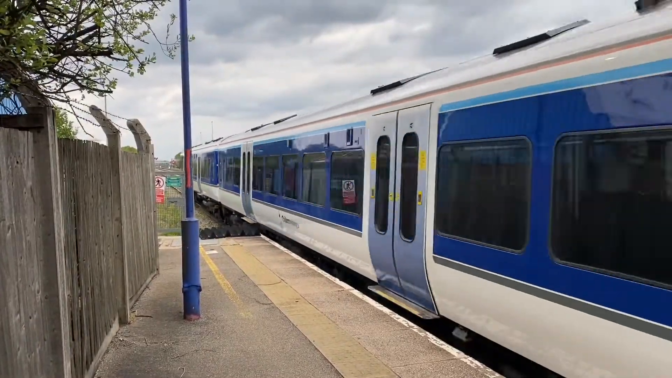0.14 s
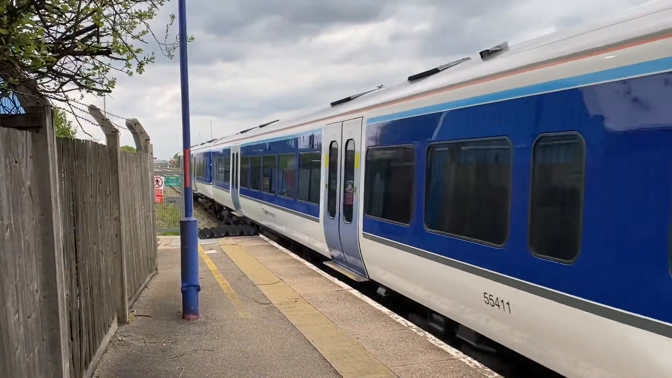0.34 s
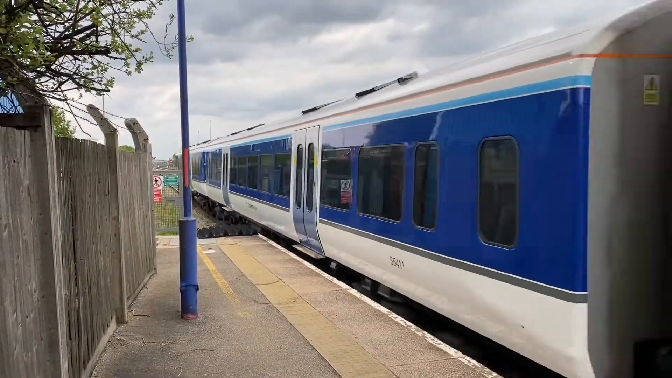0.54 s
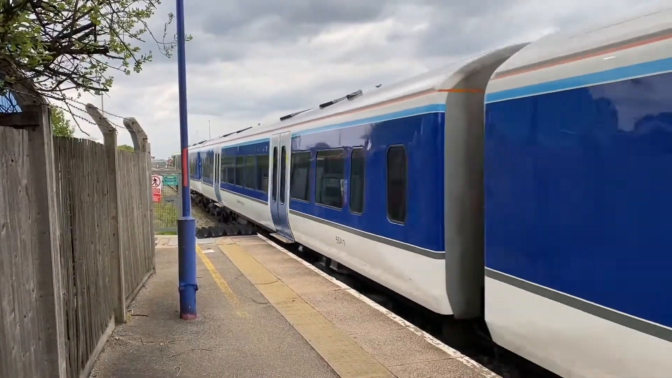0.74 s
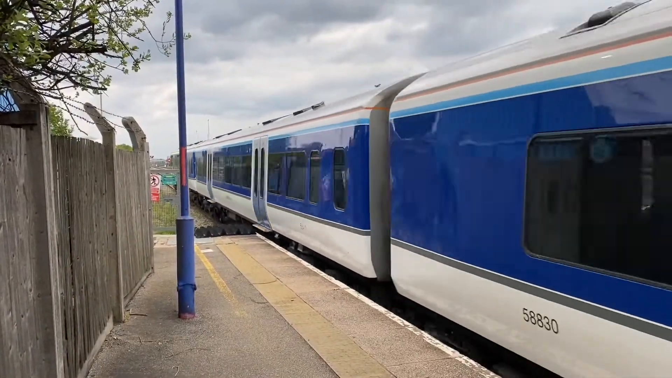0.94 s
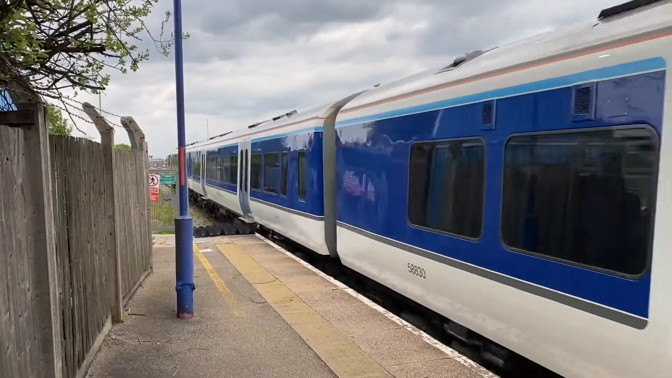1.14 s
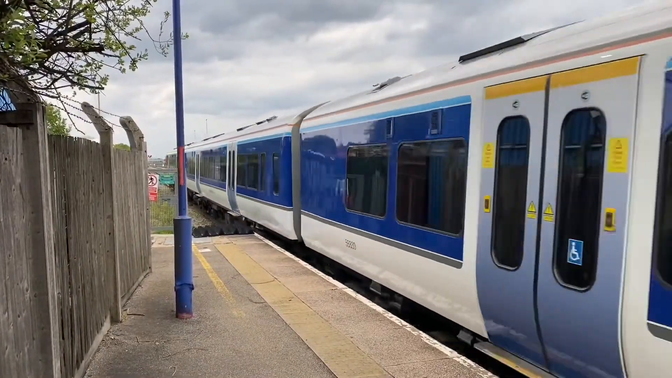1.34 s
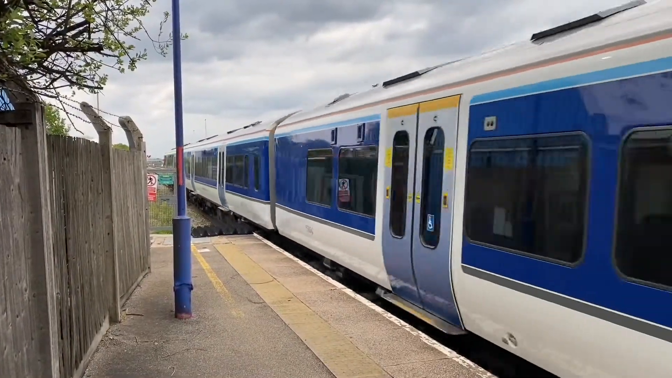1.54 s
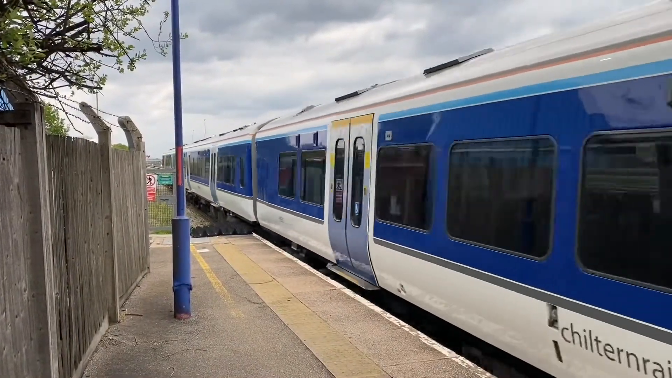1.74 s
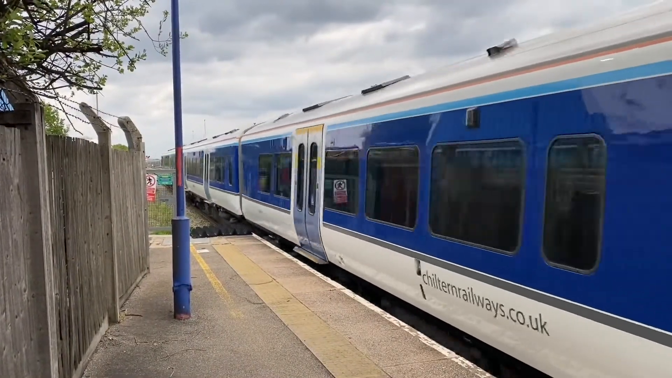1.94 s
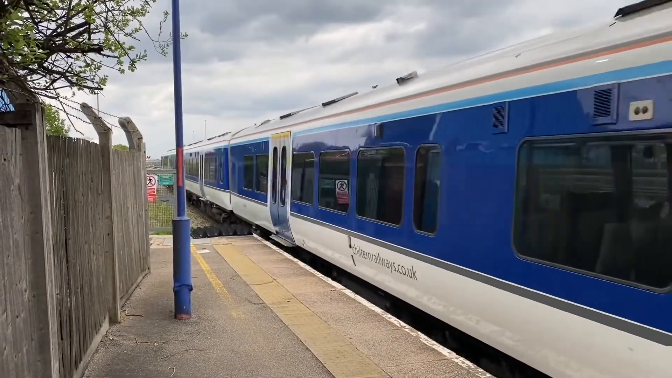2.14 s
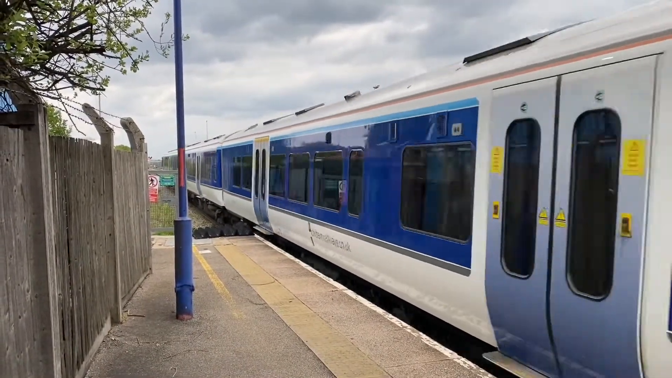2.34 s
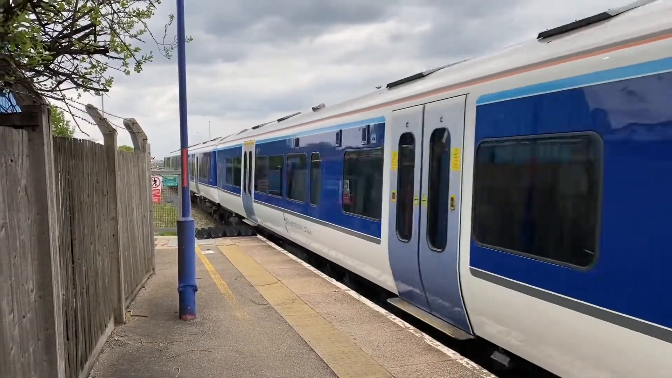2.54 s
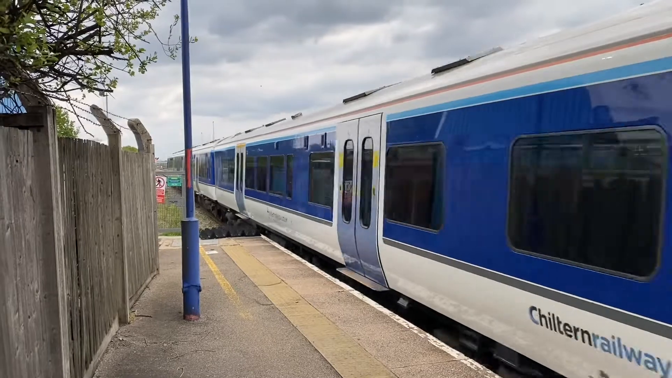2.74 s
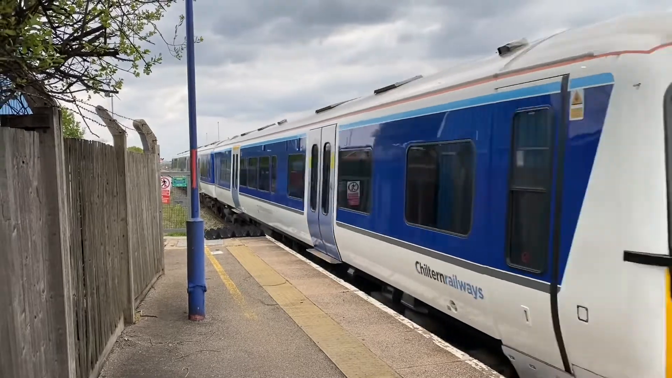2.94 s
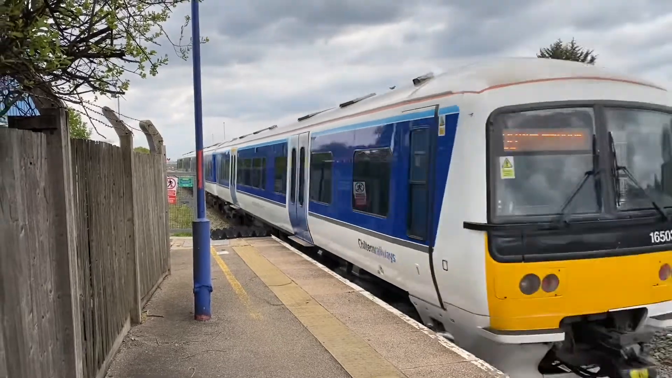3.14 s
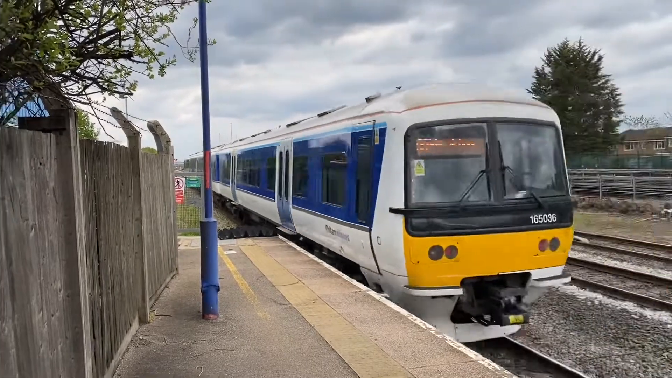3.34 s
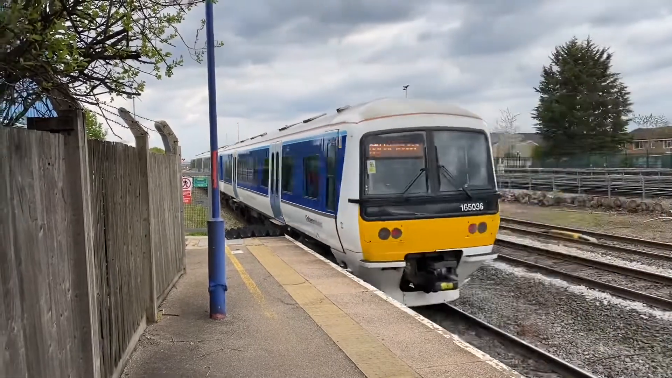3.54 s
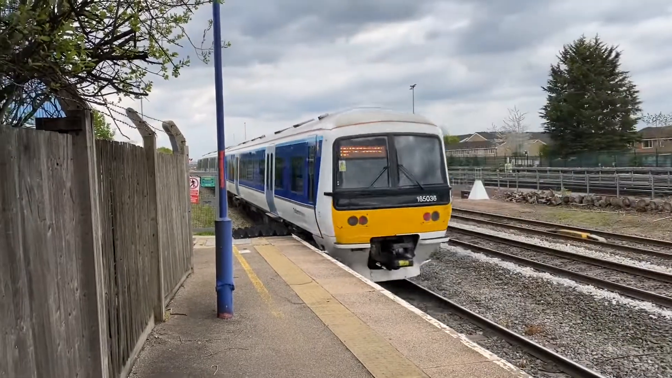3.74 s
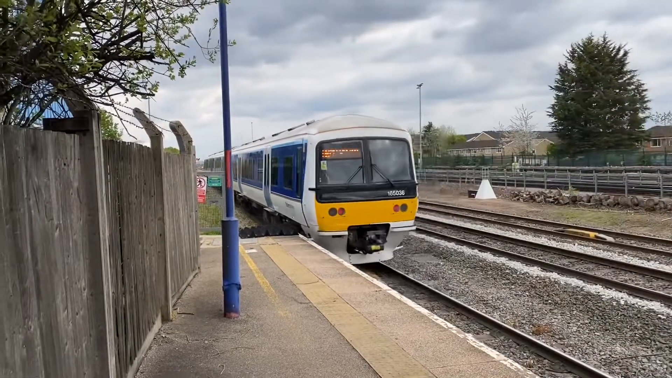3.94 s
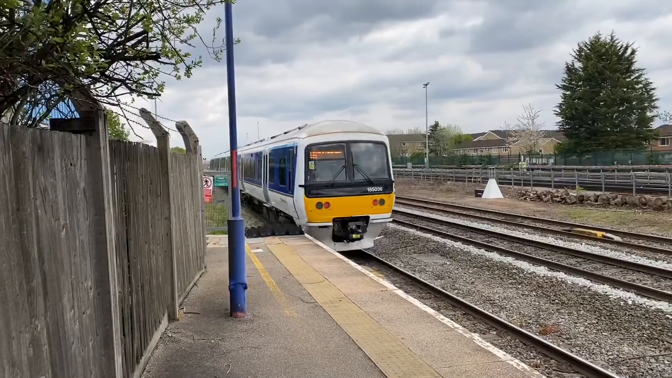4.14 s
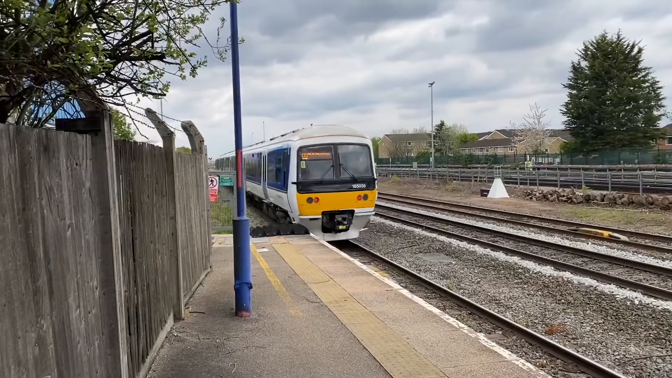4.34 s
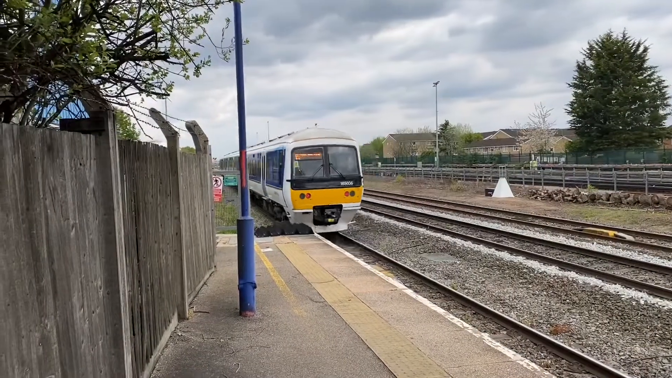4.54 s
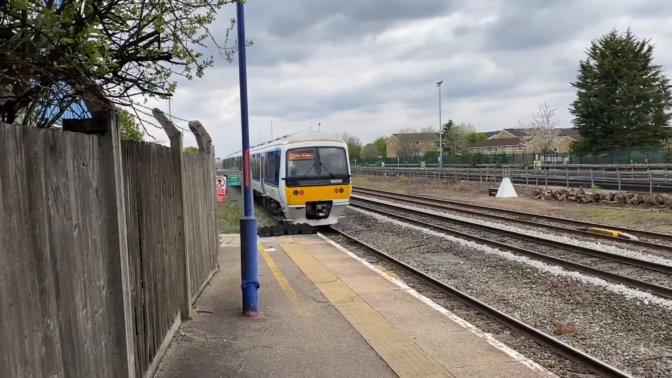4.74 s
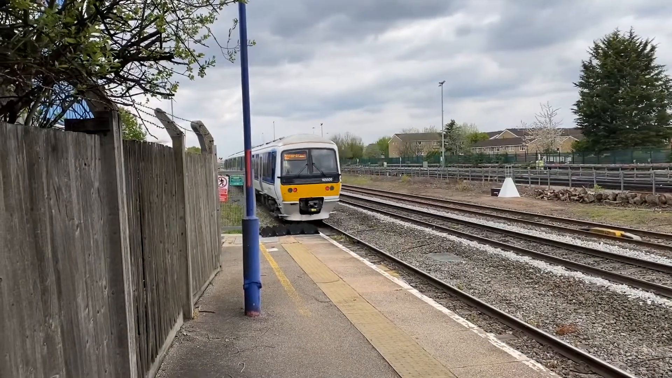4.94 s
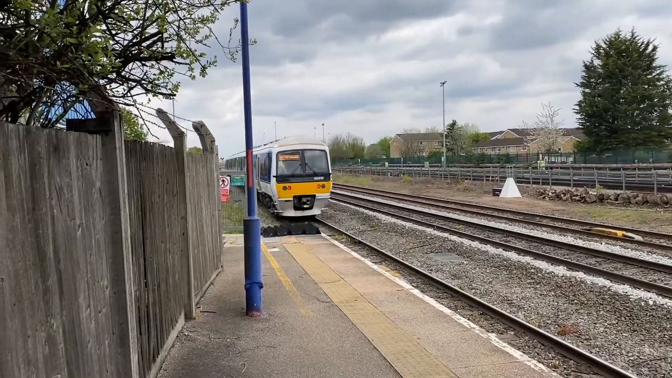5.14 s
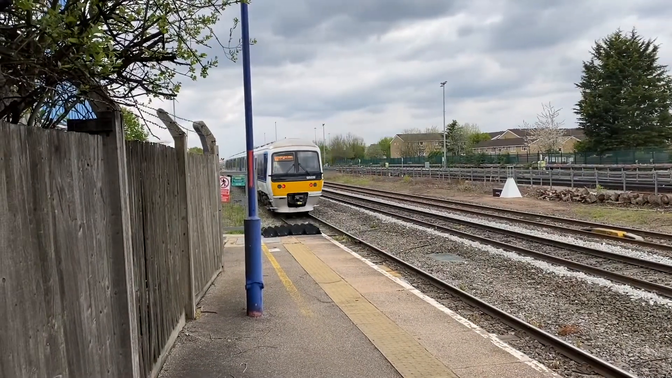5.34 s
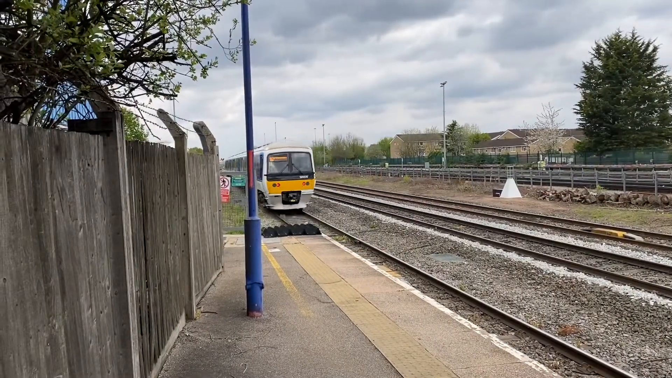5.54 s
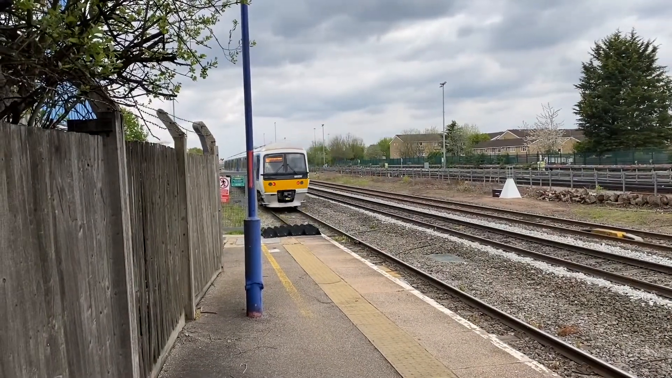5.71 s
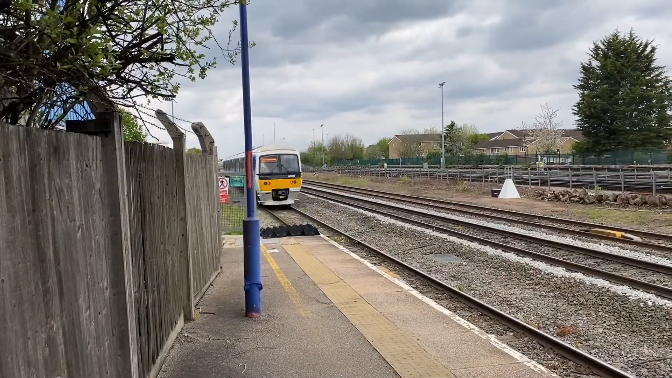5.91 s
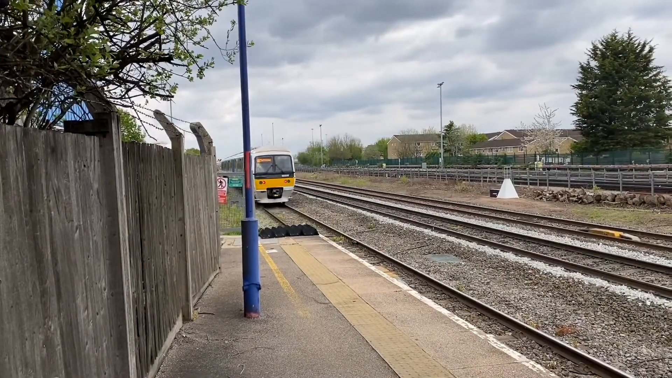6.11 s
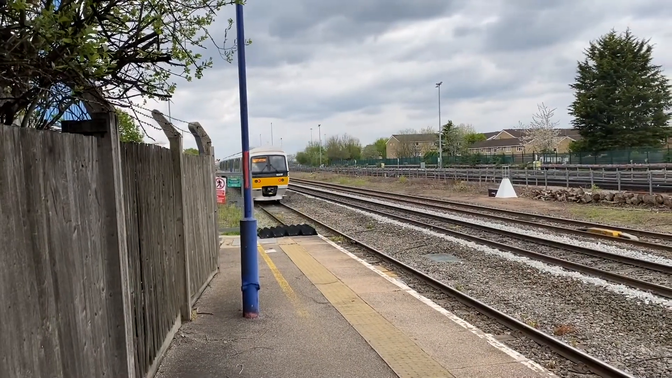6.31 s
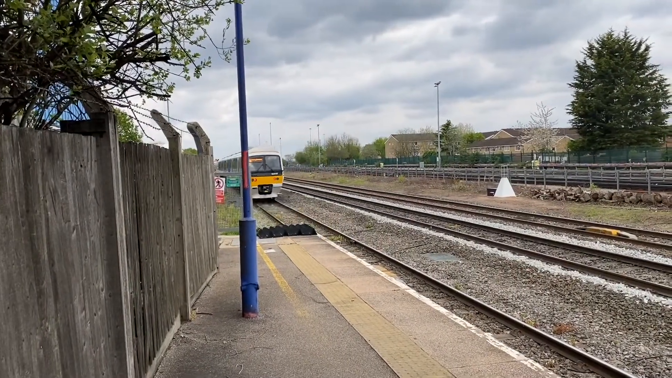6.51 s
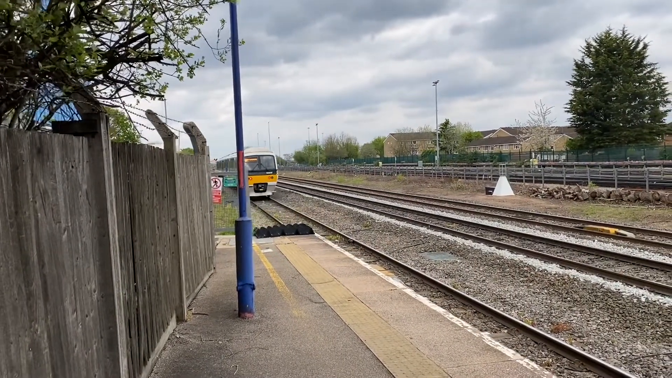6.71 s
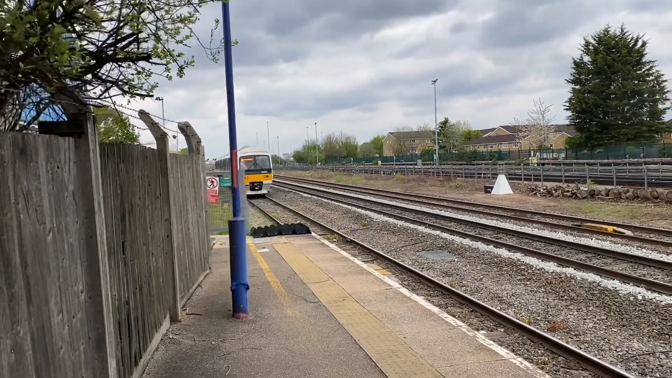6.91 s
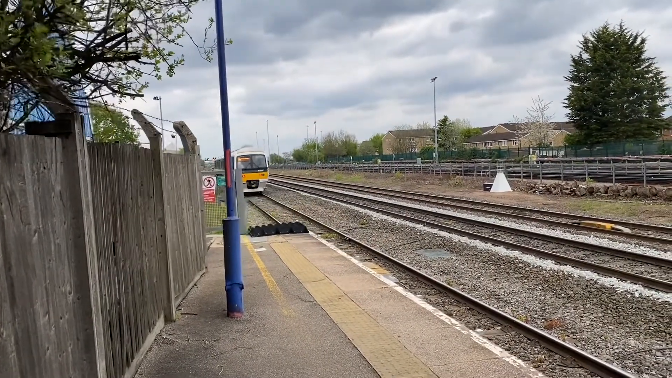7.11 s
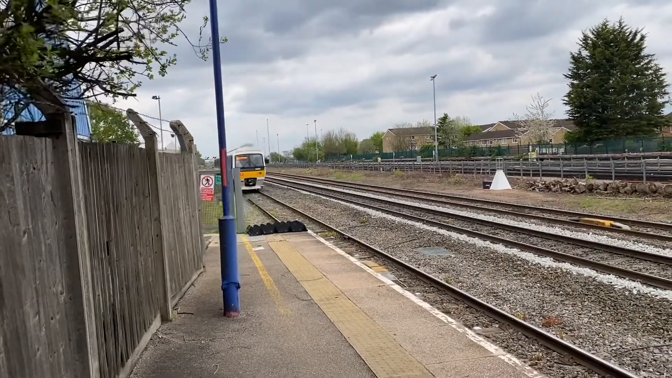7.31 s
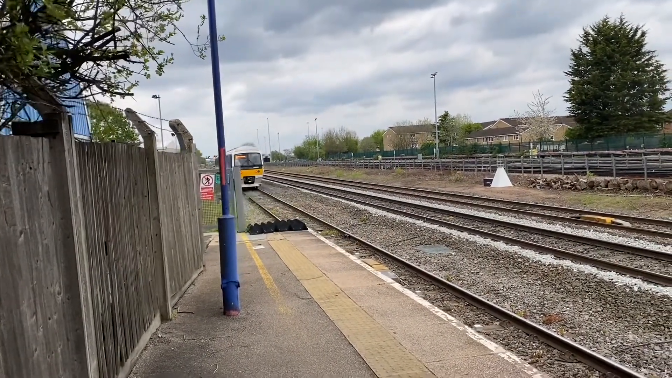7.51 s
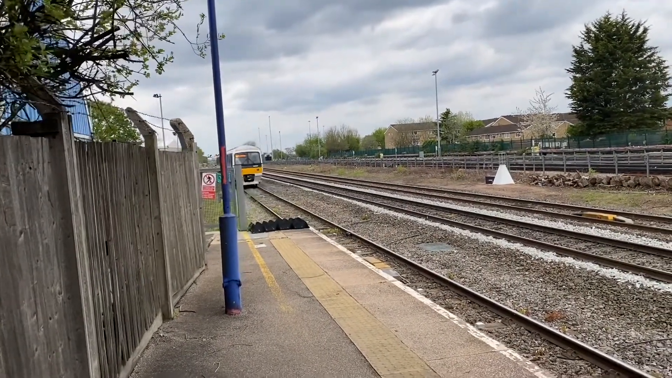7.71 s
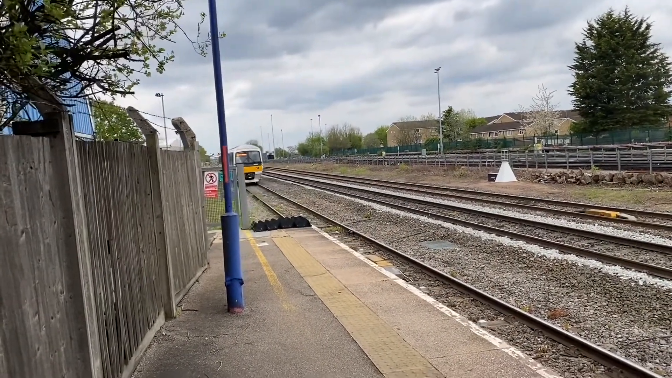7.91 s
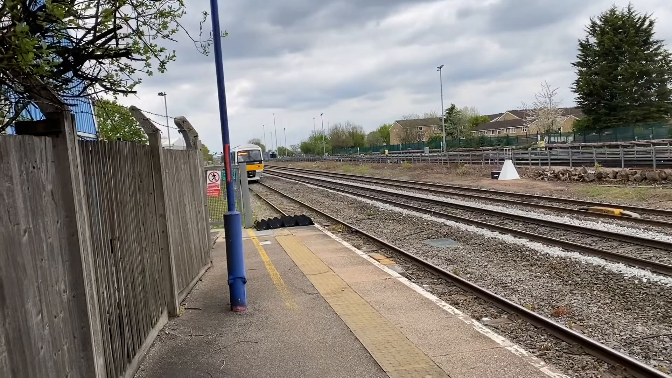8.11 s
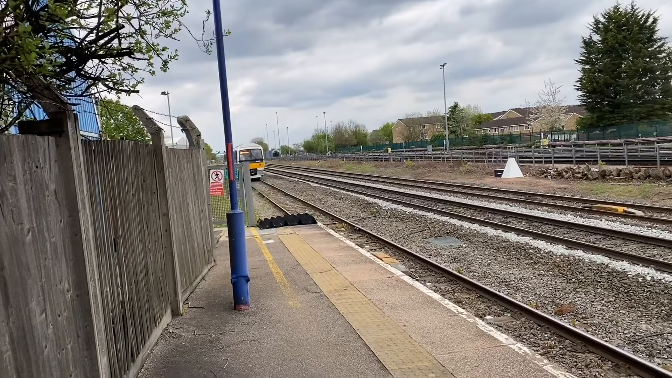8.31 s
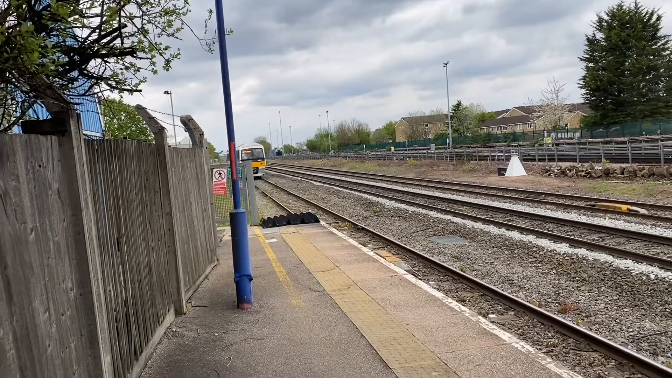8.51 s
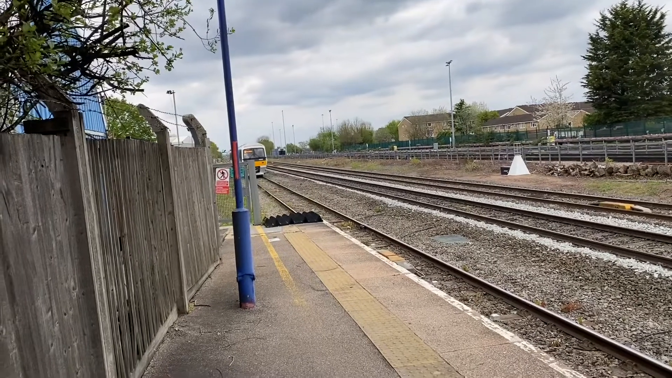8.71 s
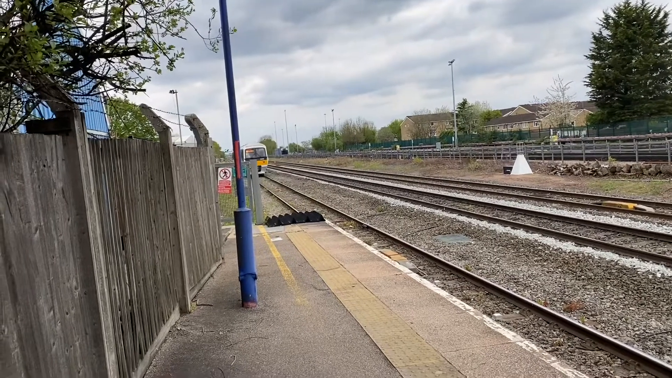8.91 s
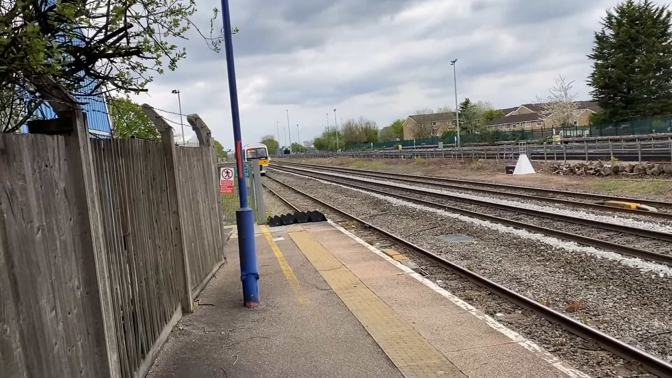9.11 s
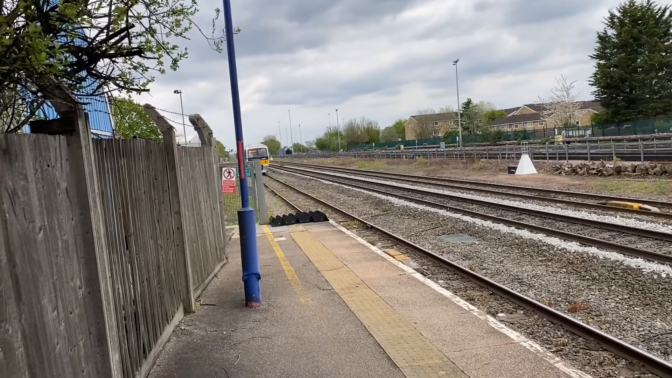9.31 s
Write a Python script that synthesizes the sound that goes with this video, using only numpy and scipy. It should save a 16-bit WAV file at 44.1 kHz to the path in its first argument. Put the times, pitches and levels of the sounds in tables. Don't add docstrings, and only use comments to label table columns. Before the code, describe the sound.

Outdoors at a platform end, a diesel train is already passing close to a handheld phone. Engines throb, wheels roar and bang over rail joints, and the middle car brings a bright turbo hiss with a rough whistle. After about three seconds the last car clears; rolling drops away, the hum fades, power is cut near six and a half seconds, and distant clicks remain with tiny bird peeps.

```python
import sys
import numpy as np
from scipy import signal
from scipy.fft import rfft, irfft
from scipy.io import wavfile
from scipy.ndimage import uniform_filter1d

SR = 44100
rng = np.random.default_rng(int(sys.argv[2]) if len(sys.argv) > 2 else 0)


def how_loud(loudness_db):
    steps = np.asarray(loudness_db, float) / 20
    return 10 ** steps


def output_pcm(signal):
    pcm = np.clip(np.atleast_2d(signal).T, -1, 1) * 32767
    wavfile.write(sys.argv[1], SR, np.round(pcm).astype(np.int16))


N = 417186
FREQ = np.fft.rfftfreq(N, 1 / SR)
TIME = np.arange(N) / SR

# start_s, length_s, start_hz, end_hz, level_db
CHIRPS = [
    (7.857, .037, 2850, 2900, -56),
    (9.322, .022, 3550, 3400, -59),
    (9.324, .035, 2950, 2850, -53),
    (8.968, .015, 4400, 3900, -59),
]
# peak_s, spread_s, level_db
RUMBLES = [
    (0.37, 0.055, -24),
    (2.65, .1, -29),
    (3.28, .06, -32),
    (4.72, 0.093, -32),
    (7.55, 0.17, -37),
    (8.85, .08, -43),
    (9.1, 0.13, -33),
    (9.45, .06, -40),
]
# pitch_hz, loudest_s, spread_s, level_db
GEARS = [
    (1100, 1.8, 0.6, -44),
    (1740, 1.7, .35, -38),
    (272.5, 2.15, .45, -33.5),
]
# order (multiple of half the firing rate), level_db
NEAR_ORDERS = [(2, -4), (3, -12.5), (4, -10), (5, -9), (6, -20), (7, -11), (8, -9.5)]
# start_s, end_s, firing_hz, level_db
SLOW_ENGINES = [
    (2.1, 4.45, 58.5, -35),
    (4.1, 6.5, 68.6, -36),
]
# freq_hz, level_db per Hz
TURBO_COLOUR = [(6000, -19), (8000, -1), (9400, 0), (10100, 3), (10900, -3.5), (12500, -6.5), (14500, -0.5),
                (15600, -6.5)]
# time_s, loss_db of rail noise
RECEDING = [(0.0, -1), (0.55, -0.5), (0.85, -1.5), (1.26, 2), (1.75, -2), (2.15, 2.5), (2.4, -2), (2.75, 0),
            (3.0, -5.5), (3.55, -6.5), (4.3, -11), (5.2, -14.5), (5.8, -14), (6.2, -13), (6.75, -19),
            (7.7, -17.5), (8.5, -23), (9.46, -20.5)]
ROLL_BANDS_HZ = (90, 400, 1600, 5000)
# alongside_db, share of the loss, lift_db by the middle car's engine
ROLL_LAYERS = [(-28.5, 0.4, -2), (-25, 1.03, -0.2), (-32, 0.53, 4.5), (-45, 0.77, 8)]
# freq_hz, level_db per Hz
ROLL_COLOUR = [(13, -37), (22, -19), (53, -2.5), (82, -3), (171, -3.5), (392, -7.5), (943, -19.5),
               (1330, -23.5), (2210, -27), (3120, -39), (3790, -34.5), (5080, -40.5), (5730, -39),
               (7500, -51), (9750, -85), (16500, -120)]
# time_s, peak_db, ring_hz, knock_db rel, crack_db rel
BLOWS = [(0.037, -1.5, 274, -17, -24.5), (0.348, -12, 255, -18, -22), (0.557, -2, 388, -14, -20),
         (0.836, -3, 419, -11.5, -20.5), (1.278, -12, 259, -16, -15), (1.764, -11, 369, -12, -24),
         (2.038, -9, 356, -20, -29), (2.254, -1.5, 300, -19, -22), (2.518, -4.5, 207, -7.5, -17.5),
         (2.554, -6, 278, -18, -21), (4.146, -11, 348, -20, -22.5), (4.378, -20.5, 484, -5, -14),
         (4.401, -11.5, 437, -3, -11.5), (5.55, -22.5, 307, -5, -13), (5.97, -17.5, 457, -4, -13),
         (6.218, -15.5, 352, 0.5, -10), (7.591, -27.5, 393, -10, -9), (7.75, -20.5, 433, -7, -8),
         (7.993, -18, 400, -8.5, -6.5), (8.608, -29, 448, -11, -16), (8.839, -34, 420, -1, -12),
         (9.086, -34.5, 498, 0, -3), (9.247, -29.5, 290, -1.5, -0.5), (9.267, -28.5, 208, 0, -7)]
# time_s, peak_db, crack_db rel
MORE_BLOWS = [(2.792, -17, -15), (3.695, -21, -20), (3.954, -19.5, -23), (4.482, -27.5, -15), (4.677, -21, -14),
              (5.099, -35, -1.5), (5.798, -23.5, -12.5), (6.176, -25, -12), (6.278, -27, -14),
              (6.492, -30, -6.5), (6.64, -35, -9), (6.9, -28.5, -12), (7.062, -27.5, -12.5), (7.304, -32, -6.5),
              (7.343, -28.5, -7.5), (7.65, -39.5, -2.5), (7.914, -35, -7), (8.099, -40, -6),
              (8.361, -31.5, -8.5), (8.54, -42, -6), (9.357, -34.5, -15)]
# pitch_hz, level_db
WHEEL_MODES = [(1750, 1.5), (2250, -0.5), (3700, -11.5)]
# freq_hz, width_hz, level_db
GROUND_DIPS = [(1374, 178, -5.5), (3090, 190, -4), (4930, 230, -3.5)]
# freq_hz, alongside (half turns), far off (half turns)
PORT_LAG = [(0, 0, 0), (700, .2, -.08), (1100, .4, -.15), (1400, .6, -.6), (1700, .9, -.35), (2400, 2, 0),
            (4200, 2, 0), (5100, 3, 1), (6300, 4, 2), (8500, 5, 3), (10200, 6, 4), (12000, 7, 5),
            (13900, 8, 6), (15700, 9, 7)]
# freq_hz, alongside (0-1), far off (0-1)
LIKENESS = [(60, 1, .97), (151, 0.79, 1), (300, 0.79, 0.91), (700, 0, 0.46), (970, 0.9, 0.88),
            (1370, 0, 0.12), (2330, 0.2, 0.6), (3100, 0.2, 0), (3970, 0, 0.4), (5200, 0, 0),
            (8060, 0.57, 0.5), (12000, 0.9, 0.8)]
# freq_hz, left minus right_db
BALANCE_DB = [(60, -0.5), (110, -1), (200, -2.0), (380, -1.5), (700, 0.5), (1290, 1.5), (2380, 0),
              (4400, 1.5), (8120, 1.5), (15000, -1.5)]
# start_s, end_s
LEAVES_S = (2.9, 2.91)

MIDDLE_CAR_S, MIDDLE_CAR_SPREAD_S = 1.633, 0.4
THROTTLE_OFF_S, THROTTLE_FALL_S = 6.57, 0.08


def level(x, db):
    return x * how_loud(db) / np.sqrt(np.mean(x ** 2))


def on_log(hz, table, column=1):
    rows = np.array(table)
    return np.interp(np.log(hz + 1), np.log(rows[:, 0] + 1), rows[:, column])


def walk(rate):
    k = int(SR / rate)
    steps = np.repeat(rng.standard_normal(N // k + 1), k)
    return 1.29 * uniform_filter1d(uniform_filter1d(steps, k), k)[:N]


def band_noise(hz, octaves):
    bell = np.exp(-(np.log2((FREQ + 1) / hz) / octaves) ** 2)
    grains = rng.standard_normal((2, len(FREQ))) + 1j * rng.standard_normal((2, len(FREQ)))
    return level(irfft(grains * bell, N), 0)


def tone(hz, wander_db):
    gain = np.sqrt(2) * how_loud(wander_db * walk(9))
    turns = np.cumsum(hz * np.ones(N)) / SR
    return gain * np.sin(2 * np.pi * (turns + rng.random()))


def fade(start_s, end_s):
    return np.clip(np.minimum(TIME - start_s, end_s - TIME) / 0.062, 0, 1)


def swell(s, spread_s):
    return np.exp(-((TIME - s) / spread_s) ** 2)


def abreast(s, spread_s):
    return 1 / (1 + ((TIME - s) / spread_s) ** 2)


def distant():
    return np.clip((TIME - LEAVES_S[0]) / (LEAVES_S[1] - LEAVES_S[0]), 0, 1)


def receding_db():
    s, loss_db = np.transpose(RECEDING)
    return np.interp(TIME, s, loss_db)


def power_off():
    return 1 / (1 + np.exp(-(TIME - THROTTLE_OFF_S) / THROTTLE_FALL_S))


def spread(pair, hz):
    far = distant()
    alike = (1 - far) * on_log(hz, LIKENESS, column=1) + far * on_log(hz, LIKENESS, column=2)
    alike = np.clip(alike, 0, 1)
    common = np.sqrt((1 + alike) / 2) * pair[0]
    apart = np.sqrt((1 - alike) / 2) * pair[1]
    return np.array([common + apart, common - apart])


def birds():
    out = np.zeros(N)
    for s, length, start_hz, end_hz, db in CHIRPS:
        along = np.clip((TIME - s) / length, 0, 1)
        glide_hz = start_hz + (end_hz - start_hz) * along
        out += how_loud(db) * np.sin(np.pi * along) ** 0.5 * tone(glide_hz, wander_db=0.5)
    return out


def rumbles():
    gain = sum(how_loud(db) * swell(s, width) for s, width, db in RUMBLES)
    return gain * band_noise(75, 0.83)[0]


def gears():
    out = 0
    for hz, s, width, db in GEARS:
        passing = 1 - 0.022 * np.tanh((TIME - s) / width) + 0.012 * walk(40)
        out = out + how_loud(db) * swell(s, width) * tone(hz * passing, wander_db=4.5)
    return out


def near_engine():
    half_hz = 34.8 + 1.3 * np.exp(-TIME / 0.501)
    orders = sum(how_loud(db) * tone(k * half_hz, wander_db=1.5) for k, db in NEAR_ORDERS)
    return orders * how_loud(-21.5) * abreast(0.31, 0.62) ** 0.5 * fade(-1, 2.44)


def rear_engine():
    firing_hz, whine_hz = 75.26, 907
    first_db = -28.5 - 2.03 * TIME
    second_db = -34 - 1.23 * TIME
    whine_db = -42.5 - 2 * TIME
    firing = how_loud(first_db) * tone(firing_hz, wander_db=3.0)
    firing = firing + how_loud(second_db) * tone(2 * firing_hz, wander_db=2.5)
    whine = how_loud(whine_db) * tone(whine_hz * (1 + 0.003 * walk(10)), wander_db=3)
    return (firing + whine * np.clip(TIME / 0.3, 0, 1)) * (1 - power_off())


def engines():
    out = near_engine() + rear_engine()
    for start, end, hz, db in SLOW_ENGINES:
        unsteady_hz = hz * (1 + 0.0199 * walk(8))
        out = out + how_loud(db) * tone(unsteady_hz, wander_db=3.0) * fade(start, end)
    return out


def turbo_hiss():
    grains = rng.standard_normal((2, N)) * how_loud(0.55 * walk(400))
    colour = how_loud(on_log(FREQ, TURBO_COLOUR)) * np.clip((FREQ - 5000) / 2500, 0, 1)
    air = irfft(rfft(grains) * colour, N)
    dull = irfft(rfft(air) * how_loud(-2.5 * (FREQ / 10000) ** 3), N)
    air = air + (dull - air) * np.clip((TIME - 4.5) / 1.6, 0, 1)
    middle = how_loud(-42) * abreast(MIDDLE_CAR_S, MIDDLE_CAR_SPREAD_S)
    others = how_loud(-57.5 + 1.04 * receding_db())
    others = others + how_loud(-70.5) * abreast(4.05, 0.42)
    gain = np.hypot(middle, others) * how_loud(-9.5 * power_off())
    return gain * how_loud(0.57 * walk(9.4)) * spread(level(air, 5.3), 10300)


def turbo_whistle():
    pass_s, spread_s = 1.2, 0.42
    hz = 3367 - 50 * np.tanh((TIME - pass_s) / spread_s)
    gain = how_loud(-40) * abreast(pass_s, spread_s) + how_loud(-57) * fade(pass_s, 3.55)
    whistle = sum(tone(hz * (1 + 0.01 * walk(150)), wander_db=1.0) for _ in range(2))
    whistle = whistle + how_loud(-9) * tone(1.063 * hz * (1 + 0.00393 * walk(40)), wander_db=3.5)
    return how_loud(-5.5 + 1.6 * walk(11)) * whistle * gain


def rolling():
    loss_db = receding_db()
    middle = abreast(MIDDLE_CAR_S, MIDDLE_CAR_SPREAD_S)
    bands_db = [db + share * loss_db + lift_db * middle for db, share, lift_db in ROLL_LAYERS]
    centres = 25 * 2 ** np.arange(0, 8.4, 0.4)
    colour = on_log(centres, ROLL_COLOUR) + 10 * np.log10(centres)
    place = np.interp(np.log(centres), np.log(ROLL_BANDS_HZ), np.arange(4))
    base = on_log(np.array(ROLL_BANDS_HZ), ROLL_COLOUR) + 10 * np.log10(ROLL_BANDS_HZ)
    out, shared = 0, walk(14)
    for hz, db, p in zip(centres, colour, place):
        k = min(int(p), 2)
        below_db = bands_db[k] - base[k]
        above_db = bands_db[k + 1] - base[k + 1]
        swell_db = (k + 1 - p) * below_db + (p - k) * above_db
        shared = 0.9 * shared + 0.44 * walk(14)
        flicker_db = 1.43 * shared + 1.0 * walk(30)
        out = out + how_loud(db + swell_db - 6.5 + flicker_db) * spread(band_noise(hz, 0.32), hz)
    return out


def burst(t, lo_hz, hi_hz):
    sos = signal.butter(3, [lo_hz, hi_hz], "bandpass", fs=SR, output="sos")
    return signal.sosfilt(sos, rng.standard_normal((2, len(t))))


def decay(t, t60, rise, late=0):
    fall = np.exp(-np.log(1000) * np.maximum(t - late, 0) / t60)
    return fall / (1 + np.exp(-(t - late) / rise))


def sine(hz, t, turns):
    return np.sin(2 * np.pi * (hz * t + turns))


def rail_blow(t, s, hz, knock_db, smear, c):
    close = s < LEAVES_S[1]
    knock_hz = (550 if close else 701) * (1 + 0.123 * (c[5] - 0.5))
    skew = 0.097 * close * np.array([[1], [-1]])
    modes = zip((1, 0.74, 1.38), (-0.3, -10, -7), c)
    ring = sum(how_loud(db) * sine(ratio * hz, t, p + skew) for ratio, db, p in modes)
    knock = sine(knock_hz, t, c[3]) + how_loud(-4) * sine(1.32 * knock_hz, t, c[6])
    knock = knock + level(burst(t, 453, 1076), -2.5)
    knock_decay = decay(t, 0.041, 0.00077, late=0.00071) + 0.14 * decay(t, smear, 0.006)
    blow = ring * decay(t, 0.066, 0.00099, late=0.0018) + how_loud(knock_db + 0.64) * knock * knock_decay
    bounce_s = 0.01 + 0.016 * c[4]
    return blow + how_loud(-8.5) * np.roll(blow, int(bounce_s * SR), axis=1)


def rattle(t):
    track = level(burst(t, 226, 570), -9.5) * decay(t, 0.26, 0.0061, late=-0.003)
    sleepers = level(burst(t, 104, 307)[0], -15) * decay(t, 0.21, 0.0054, late=0.017)
    return track + sleepers


def crack(t, s, crack_db, smear, c):
    noise = burst(t, 1220, 2440) + how_loud(-15.5) * burst(t, 3150, 5870)
    noise = noise + how_loud(-21.5 - 2.4 * s) * burst(t, 6500, 14000)
    modes = zip(WHEEL_MODES, c[7:], c[10:])
    wheel = sum(how_loud(db) * sine(hz * (1 + 0.08 * (p - 0.5)), t, q) for (hz, db), p, q in modes)
    noise = noise + level(wheel, -17.5)
    shared = 0.66 * noise[0] + 0.68 * noise
    envelope = decay(t, 0.059, 0.0014, late=-0.00079) + 0.51 * decay(t, smear, 0.0088, late=-0.002)
    return level(shared, crack_db - 3) * envelope


def joints():
    lead = int(0.03 * SR)
    t = (np.arange(SR // 4) - lead) / SR
    out = np.zeros((2, N + SR))
    more_blows = []
    for (s, db, crack_db), p in zip(MORE_BLOWS, rng.random(len(MORE_BLOWS))):
        more_blows.append((s, db, np.interp(p, (0, 1), (237.5, 400)), crack_db + 3.5, crack_db))
    chance = rng.random((len(BLOWS + more_blows), 16))
    for (s, db, hz, knock_db, crack_db), c in zip(BLOWS + more_blows, chance):
        smear = 0.18 + 0.01 * s
        hit = rail_blow(t, s, hz, knock_db, smear, c) + rattle(t) + crack(t, s, crack_db, smear, c)
        i = int(s * SR)
        out[:, i:i + len(t)] += how_loud(db) * hit
    return out[:, lead:lead + N]


def scene():
    nearby = birds() + gears() + rumbles()
    train = engines() + turbo_hiss() + turbo_whistle() + rolling() + joints()
    dips_db = sum(db * np.exp(-((FREQ - hz) / width) ** 2) for hz, width, db in GROUND_DIPS)
    echoed = irfft(rfft(train) * how_loud(dips_db), N)
    return (1 - distant()) * train + distant() * echoed + nearby


def low_pass(x):
    return signal.sosfilt(signal.butter(12, 15850, fs=SR, output="sos"), x)


def record(dry):
    hz, *lags = np.transpose(PORT_LAG)
    tilt = how_loud(on_log(FREQ, BALANCE_DB) / 2)
    low_cut = 1 / np.sqrt(1 + (29 / (FREQ + 1)) ** 12)
    left, right = rfft(dry) * low_cut * np.array([tilt, 1 / tilt])
    near, far = (irfft(left * np.exp(-1j * np.pi * np.interp(FREQ, hz, lag)), N) for lag in lags)
    ports = np.array([(1 - distant()) * near + distant() * far, irfft(right, N)])
    ports = ports / (1 + np.abs(ports) ** 6) ** (1 / 6)
    return low_pass(ports)


dry = scene()
out = record(dry)
output_pcm(out)
```